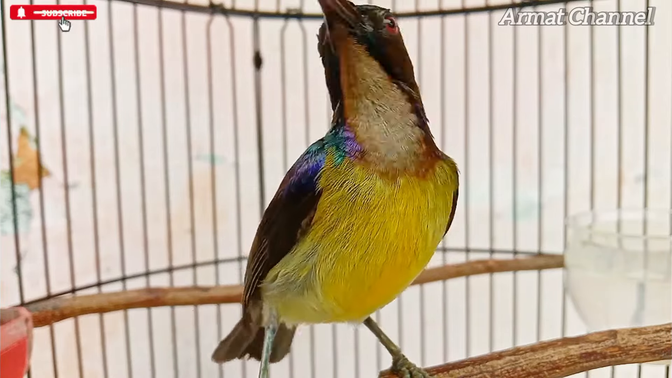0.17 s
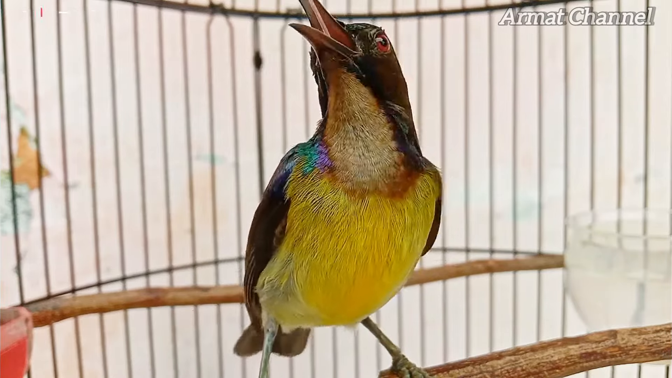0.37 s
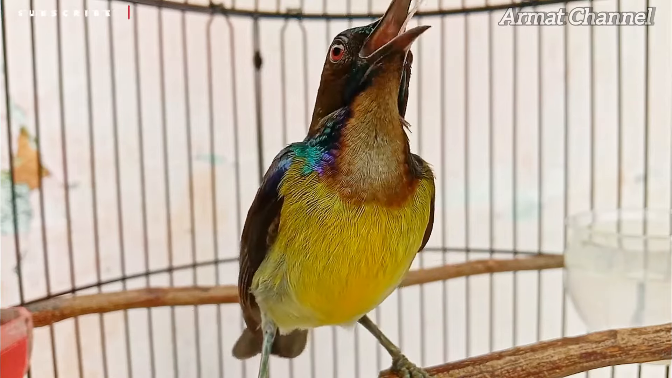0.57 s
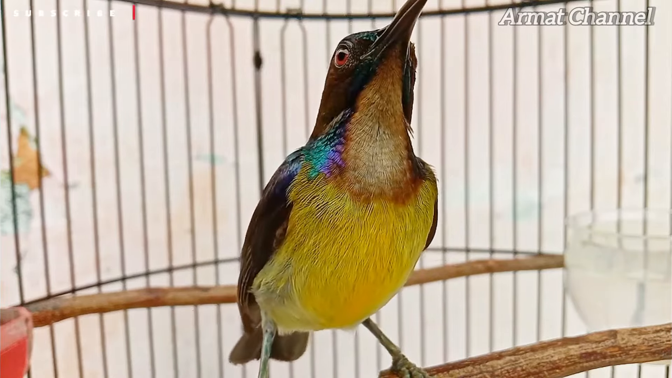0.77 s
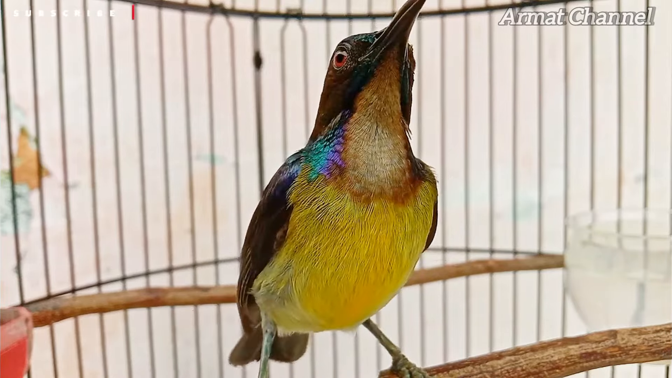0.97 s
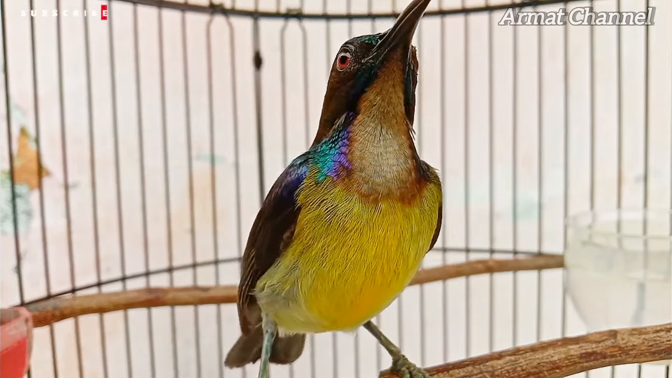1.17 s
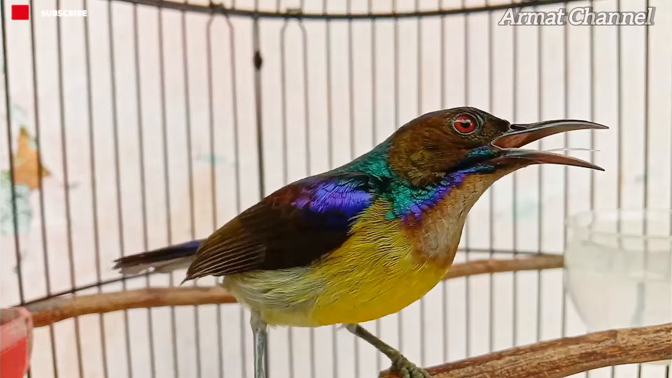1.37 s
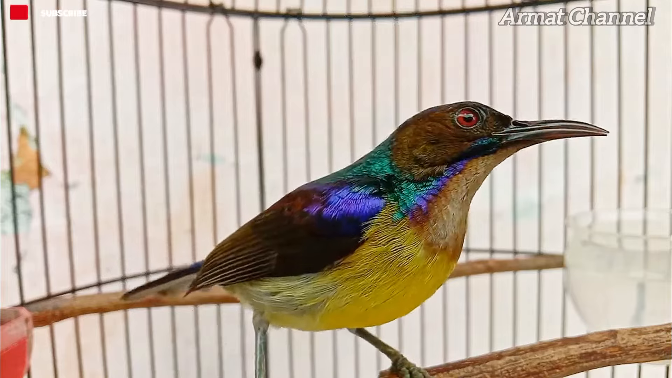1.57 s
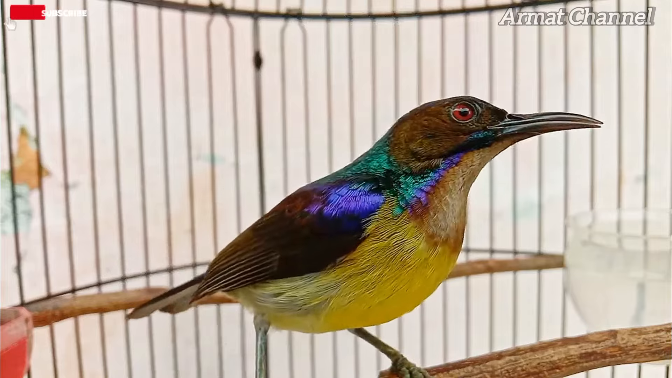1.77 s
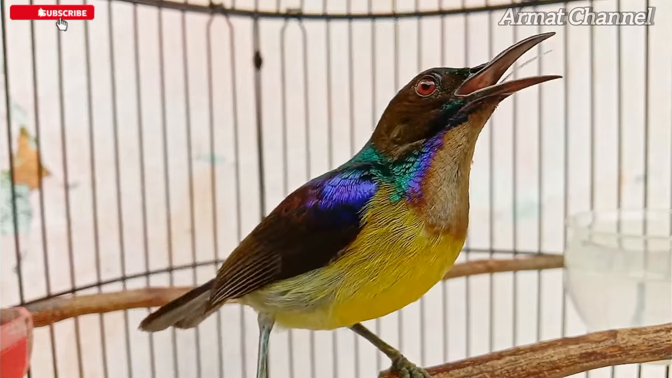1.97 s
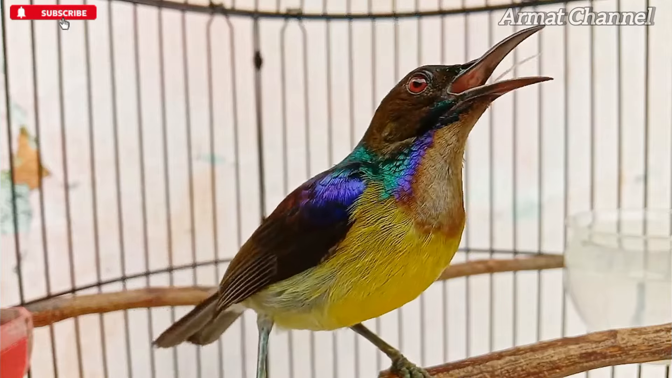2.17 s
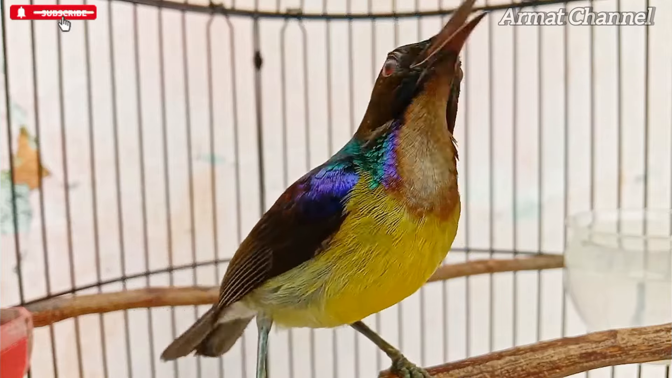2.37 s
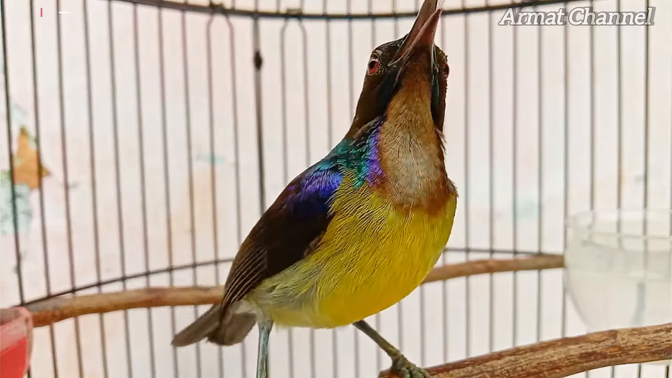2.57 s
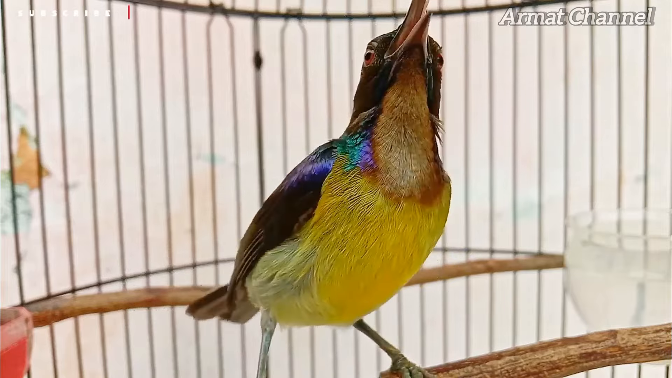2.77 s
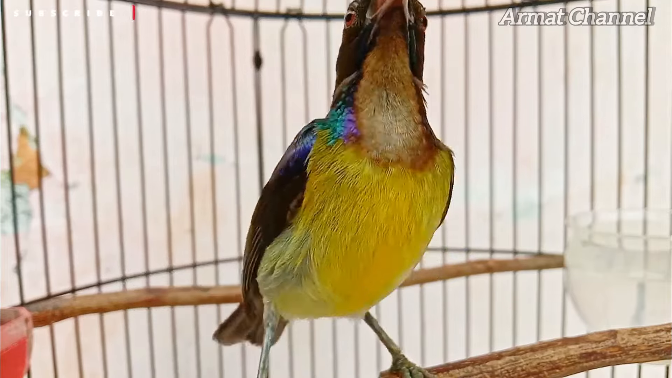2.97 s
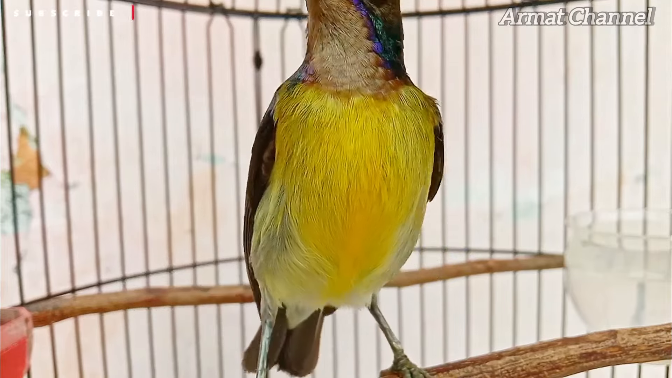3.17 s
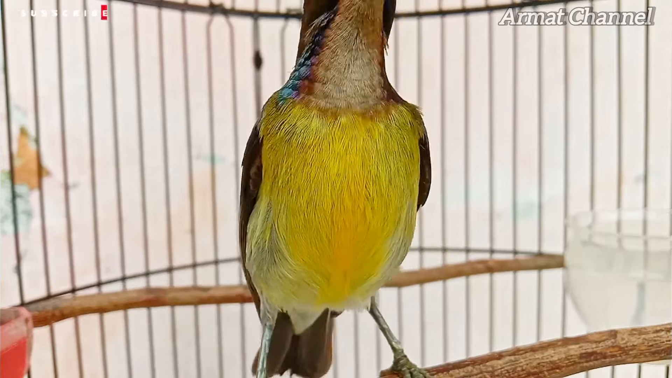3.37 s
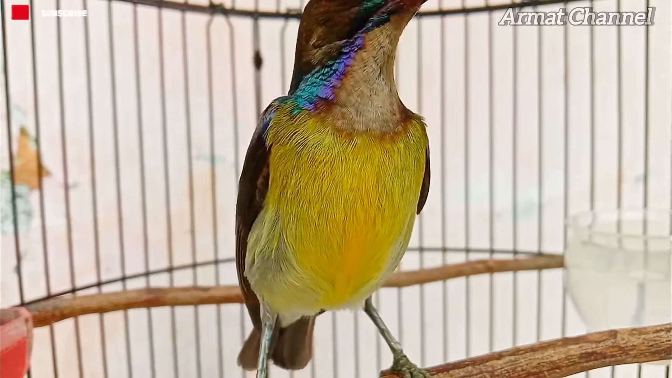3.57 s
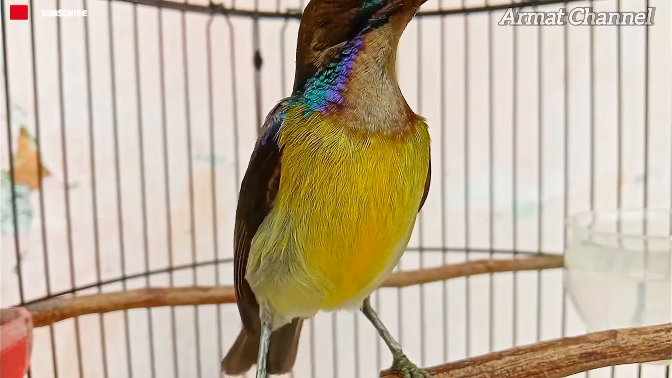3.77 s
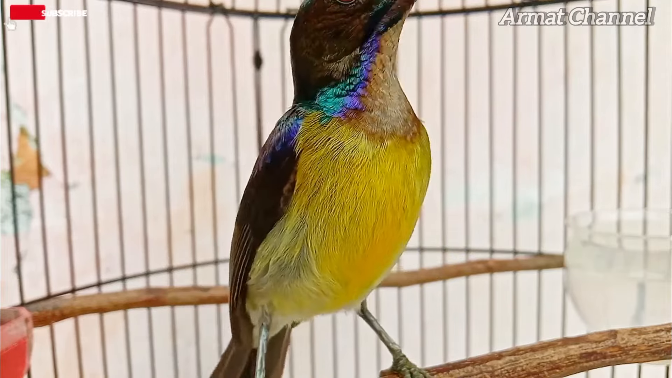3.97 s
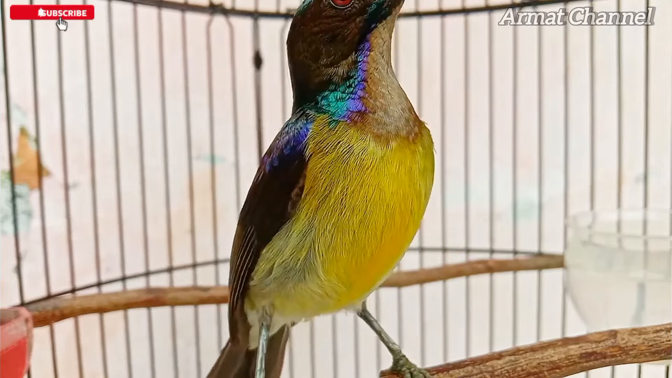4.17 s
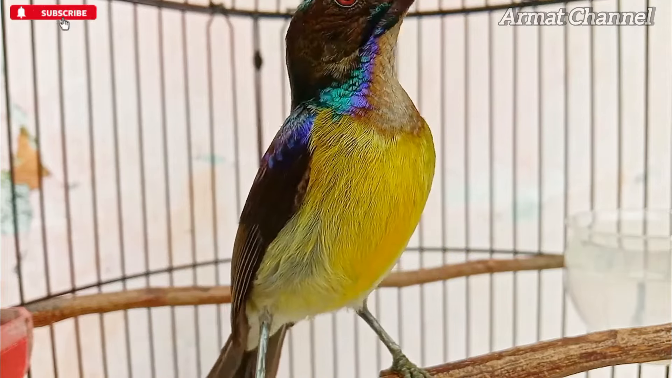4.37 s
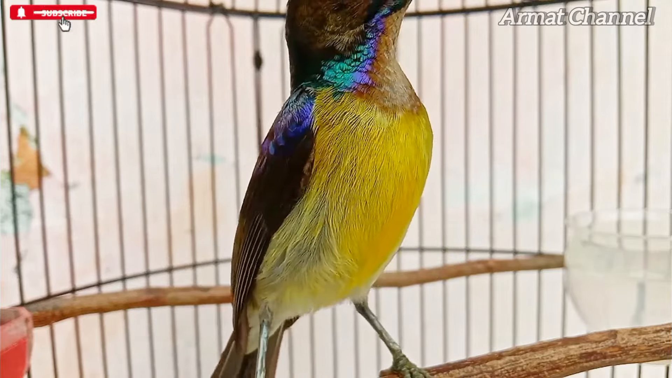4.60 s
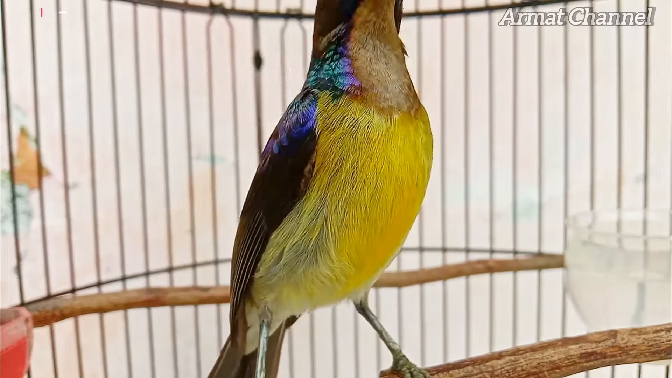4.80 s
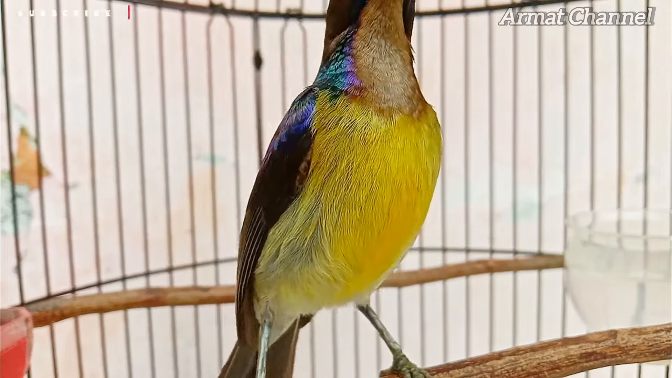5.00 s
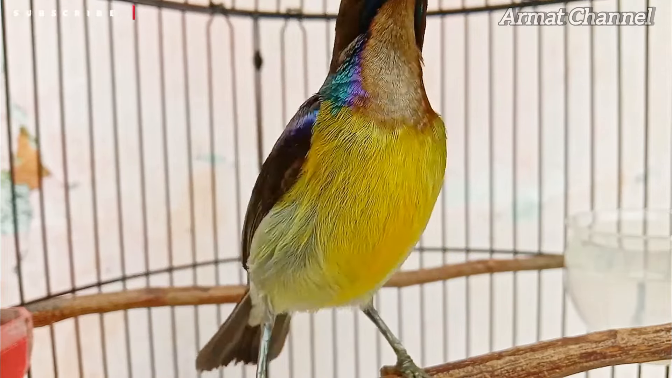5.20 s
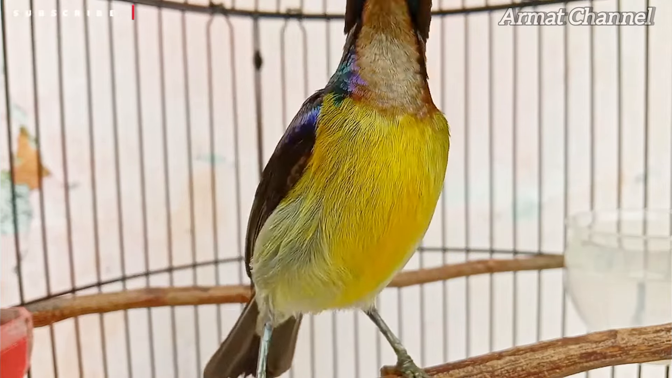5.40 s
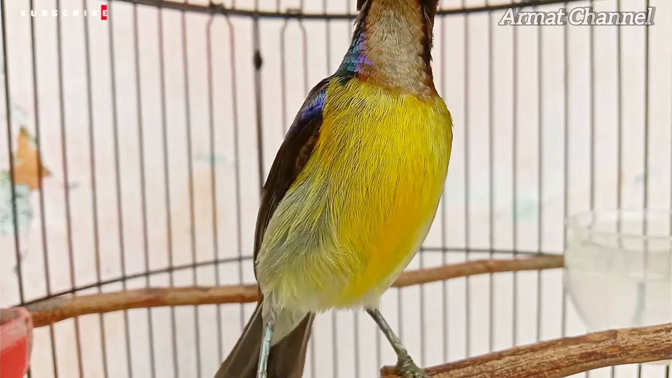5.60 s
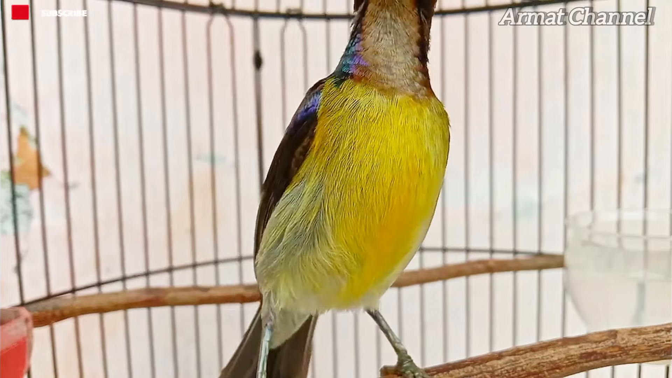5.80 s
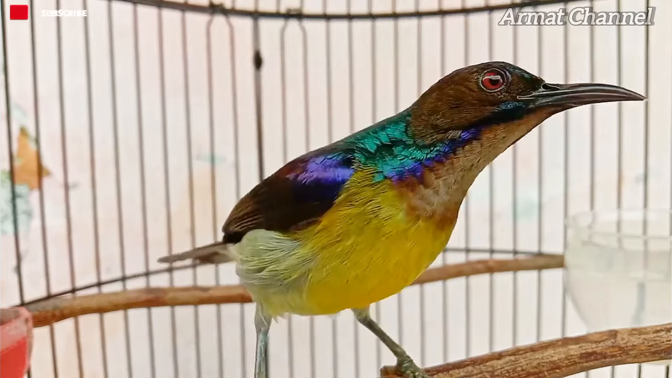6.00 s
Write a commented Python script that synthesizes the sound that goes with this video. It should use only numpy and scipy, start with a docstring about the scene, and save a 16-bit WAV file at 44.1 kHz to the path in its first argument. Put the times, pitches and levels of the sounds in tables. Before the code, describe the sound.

A small bird in a wire cage sings sharp, slightly raspy-edged chirps, dry and close with a short room tail. Spaced calls become an even run, rising to short piercing notes and a slurred whistle, then the song ends. Feathers flutter lightly midway. A low fan hum and thin hiss stay underneath, and a muffled motorbike passes faintly in the distance during the final quiet second.

```python
"""A caged sunbird sings arched chirps close to the microphone, quickening into a high trill:
a harmonic tone swept through a fixed throat. Its bill ticks and its wings flick between chirps,
as bursts of coloured noise; close cage echoes and a small room's diffuse tail answer each note.
A fan hums with wavering tones and noise, other birds call far off in single glides, and a motorbike
passes as pulses through exhaust resonances. A compressor ducks them under the song."""
import sys
import numpy as np
from scipy import signal
from scipy.fft import rfft, irfft
from scipy.io import wavfile
from scipy.ndimage import uniform_filter1d, minimum_filter1d

SR = 44100
rng = np.random.default_rng(int(sys.argv[2]) if len(sys.argv) > 2 else 0)


def unload_audio(sound):
    """Save the sound as a 16-bit wav file, at the path given as the first command line argument."""
    columns = np.transpose(np.atleast_2d(sound))
    # keep every value between -1 and 1, then stretch to whole-number steps
    steps = np.round(np.clip(columns, -1, 1) * 32767)
    wavfile.write(sys.argv[1], SR, steps.astype(np.int16))


N = 266584
TIME = np.arange(N) / SR


def amp(db):
    """Decibels to gain."""
    return 10 ** (np.asarray(db) / 20)


def unit(x):
    """Scales to rms 1."""
    return x / np.sqrt(np.mean(x ** 2) + 1e-20)


def read(points, hz):
    """Reads a (pitch_hz, value) table on a log-frequency axis."""
    table_hz, value = np.transpose(points)
    return np.interp(np.log(hz + 1), np.log(table_hz + 1), value)


def over_time(points, s):
    """Reads a (time_s, value) table along straight lines."""
    return np.interp(s, *np.transpose(points))


def add(mix, start_s, sound):
    """Mixes a sound in at its start time; what falls before zero or past the end is lost."""
    at = round(start_s * SR)
    sound = sound[max(-at, 0):]
    part = mix[max(at, 0):][:len(sound)]
    part += sound[:len(part)]


def noise(spectrum, size=N):
    """Noise of rms 1 with the given colour."""
    hz = np.fft.rfftfreq(size, 1 / SR)
    white = rfft(rng.standard_normal(size))
    return unit(irfft(white * amp(read(spectrum, hz)), size))


def wander(rate_hz):
    """A smooth random curve of rms 1."""
    hz = np.fft.rfftfreq(N, 1 / SR)
    white = rfft(rng.standard_normal(N))
    return unit(irfft(white * np.exp(-(hz / rate_hz) ** 2), N))


def edges(size, attack_s=0.0027, release_s=0.006):
    """A window that opens quickly and closes more softly."""
    t = np.arange(size) / SR
    ramp = np.minimum(np.minimum(t / attack_s, t[::-1] / release_s), 1)
    return np.sin(np.pi / 2 * ramp) ** 2


# Throat and open bill favour whichever harmonic lies near 5.5 kHz: pitch_hz, level_db
THROAT_RESONANCE = [(1000, -34.5), (1800, -34.5), (2500, -32), (3100, -18), (3600, -15), (4300, -10),
                    (5500, 0), (6200, -3.5), (6700, -11.5), (7300, -12.5), (8300, -30), (10000, -33),
                    (12000, -37.5), (14000, -34), (15000, -26.5)]
# Strength of the syrinx harmonics: multiple, level_db
SYRINX_HARMONICS = [(1, 0), (2, -4.5), (3, -14), (4, -21.5), (5, -24), (6, -31.5), (7, -37)]
# The upper harmonics are beamed and change as the head turns: time_s, level_db
HEAD_AIM = [(0, 0.5), (.5, -0.5), (1.2, -2), (1.8, 0), (2.3, -0.5), (3.1, -1.5), (3.9, 0), (4.5, 2), (5, 0)]
# The cage reinforces some frequencies at the microphone and cancels others: pitch_hz, level_db
CAGE_RIPPLE = [(2000, -2), (2500, 2.5), (2900, -6.5), (3500, -4), (4450, 3), (4950, -4), (5350, 0),
               (5750, 1), (6050, 6.5), (6600, -4.5), (7000, -2), (8300, 0), (9500, 0.5), (12000, 14)]


def sunbird(jitter=0.0032, slack_jitter=0.044, slack_hz=2150, rasp_db=-20, air_db=-44,
            pure_hz=3500, purity_db=-17, flicker_db=3.0, shimmer_db=1.9):
    """The syrinx sweeps a harmonic tone through the throat; it rasps at low pitch, turns pure at high."""
    out = np.zeros(N)
    tremble, turbulence = wander(910), noise(THROAT_RESONANCE)
    flicker, shimmer = wander(30), wander(110)
    for start_s, (hz, effort_db) in song():
        here = (round(start_s * SR) + np.arange(len(hz))) % N
        slack = 1 / (1 + (hz / slack_hz) ** 10)  # near 1 at low pitch
        shaken_hz = hz * (1 + (jitter + slack_jitter * slack) * tremble[here])
        phase = 2 * np.pi * np.cumsum(shaken_hz) / SR
        overtones_db = purity_db * np.maximum(np.log2(hz / pure_hz), 0)  # per octave above pure_hz
        bright_db = over_time(HEAD_AIM, start_s)
        tone = np.zeros(len(hz))
        for k, (_, harmonic_db) in enumerate(SYRINX_HARMONICS, 1):
            level_db = harmonic_db + read(THROAT_RESONANCE, k * hz) + read(CAGE_RIPPLE, k * hz)
            level_db += np.sqrt(k - 1) * overtones_db
            if k > 2:
                level_db += bright_db + flicker_db * flicker[here * k % N]  # k times as fast
            tone += amp(level_db) * (k * hz < SR / 2) * np.sin(k * phase)
        rasp = (amp(rasp_db) * slack + amp(air_db)) * turbulence[here]
        effort = amp(effort_db + shimmer_db * shimmer[here])
        add(out, start_s, effort * (tone + rasp) * edges(len(hz)))
    return out


# Chirps close to the microphone: start_s, length_s, rise_s (to the knee), top_s (time to the top),
# drop_s (final drop), up_hz (halfway up), top_hz, down_hz (halfway down), effort_db, tick_db (bill)
CHIRP_NOTES = [ (-.1, 0.16, .015, 0.075, 0.019, 2550, 2780, 2730, -0.5, -45),
               (0.135, 0.17, .012, 0.065, 0.023, 2620, 3026, 2762, 0, -37),
               (0.407, 0.16, 0.028, 0.062, 0.015, 2690, 3087, 2710, 0, -47),
               (1.196, 0.15, .022, .07, 0.019, 2600, 2850, 2510, 0, -23),
               (1.769, 0.17, 0.02, 0.068, 0.024, 2560, 2865, 2662, 0, -34),
               (2.035, 0.18, 0.012, 0.066, 0.02, 2720, 3118, 2750, 0.5, -22),
               (2.282, 0.19, 0.019, 0.077, 0.019, 2850, 3068, 2757, 0, -26),
               (2.542, 0.17, 0.014, 0.071, 0.013, 2630, 3146, 2766, 0.5, -29.5),
               (2.811, 0.17, 0.016, 0.074, 0.018, 2720, 3072, 2712, 0.5, -46),
               (3.078, 0.15, 0.017, 0.071, 0.015, 2630, 3155, 2705, -0.5, -32),
               (3.399, 0.17, 0.011, 0.06, .02, 2710, 3182, 2756, 0, -21.5),
               (3.638, 0.17, 0.0085, 0.061, 0.017, 2750, 3404, 2767, 1, -25.5),
               (3.887, .169, .013, .053, 0.017, 2820, 3700, 2790, 0, -22),
               (4.124, 0.12, 0.015, 0.062, 0.019, 3000, 3980, 3603, 2, -32),
               (4.299, .08, 0.013, .035, 0.0037, 5610, 7130, 6840, -5, -37),
               (4.44, 0.1, 0.017, .045, 0.022, 3670, 4794, 4440, 0, -36),
               (4.775, .08, .014, 0.059, 0.0047, 6250, 6810, 6280, -7.5, -31),
               (4.939, 0.096, 0.024, 0.043, 0.014, 3035, 4640, 4380, 0.5, -35)]
# One slurred whistle in the trill shoots up and settles: time_s, pitch_hz, effort_db
SLURRED_WHISTLE = [(4.593, 1400, -15.5), (4.608, 2830, -3), (4.62, 6750, -1), (4.628, 7460, 5),
                   (4.64, 6210, 1.5), (4.651, 5525, 2), (4.673, 5725, 2.5), (4.687, 6050, -4),
                   (4.698, 5020, -16)]
# The second side of the syrinx overlaps one chirp with a high squeak: time_s, pitch_hz, effort_db
HIGH_SQUEAK = [(1.758, 2930, -2), (1.762, 6600, -20), (1.765, 7670, 11), (1.772, 7420, -3.5),
               (1.779, 7100, 13), (1.787, 6080, -13), (1.795, 6260, -13), (1.807, 4900, -16)]


def song():
    """Every note as its start time and its pitch and effort curves."""
    chirps = [chirp(*row[:-1]) for row in CHIRP_NOTES]
    return chirps + [follow(SLURRED_WHISTLE), follow(HIGH_SQUEAK)]


# Effort that the syrinx puts into each pitch: pitch_hz, effort_db
PITCH_EFFORT = [(1250, -5.5), (1550, -2), (1950, 1.5), (2300, 3), (2700, 4), (3300, -1.5), (4500, 1.5),
                (7000, 16.5)]


def chirp(start_s, length_s, rise_s, top_s, drop_s, up_hz, top_hz, down_hz, effort_db):
    """A note leaps from slack to the knee, arches over the top, sags back and drops away."""
    edge_hz, knee_hz = 1100, 2330
    arch = 1.6  # 1 is a pointed top, 2 is round
    rounding = 0.043  # share of the length over which bends are smoothed
    fade_db = -0.5  # effort lost evenly from start to end
    end_db, end_s = -5.5, 0.042  # further slump as the chirp closes
    t = np.arange(0, length_s, 1 / SR)
    sag_end = length_s - drop_s
    halfway_up, halfway_down = (rise_s + top_s) / 2, (top_s + sag_end) / 2
    times = np.sort([0, rise_s, halfway_up, top_s, halfway_down, sag_end, length_s])
    pitches = np.array([edge_hz, knee_hz, up_hz, top_hz, down_hz, knee_hz, edge_hz])
    # straight lines in this bent scale become arches in pitch
    bent = np.sign(times - top_s) * abs(top_hz - pitches) ** (1 / arch)
    swing = np.interp(t, times, bent)
    hz = uniform_filter1d(top_hz - abs(swing) ** arch, size=max(round(rounding * len(t)), 1))
    closing_db = fade_db * t / length_s + end_db * np.exp((t - length_s) / end_s)
    return start_s, [hz, effort_db + read(PITCH_EFFORT, hz) + closing_db]


def follow(rows):
    """Start time and the rounded-off pitch and effort curves of one drawn call."""
    s, *columns = np.transpose(rows)
    s = np.sort(s)
    t = np.arange(s[0], s[-1], 1 / SR)
    return s[0], [uniform_filter1d(np.interp(t, s, column), size=90) for column in columns]


def onset_noise(level_db=-25, rise_s=0.003, fall_s=0.006, lag_s=0.004):
    """A short, soft burst of noise in the throat's colour around the start of each chirp."""
    swell = np.zeros(N)
    t = (np.arange(2048) - 1024) / SR
    shape = np.exp(np.minimum(t / rise_s, -t / fall_s))
    for start_s, *_ in CHIRP_NOTES:
        add(swell, start_s + lag_s + t[0], shape)
    return amp(level_db) * swell * noise(THROAT_RESONANCE)


# Colour of the bill snap: pitch_hz, level_db
BILL_COLOUR = [(100, -13.5), (500, -10.5), (1300, 1), (2500, -7.5), (5500, 12), (7500, -15), (10000, -33),
               (15000, -38.5)]


def ticks(level_db=0, lead_s=0.0052):
    """The bill snaps open just before each chirp: a tiny burst of coloured noise."""
    out, t = np.zeros(N), np.arange(1024) / SR
    shape = (1 - np.exp(-t / .0003)) * np.exp(-t / .0012)
    for start_s, *_, tick_db in CHIRP_NOTES:
        snap = noise(BILL_COLOUR, size=1024) * shape
        add(out, start_s - lead_s, amp(tick_db + level_db) * snap)
    return out


# Wing flicks and body thumps near the microphone: start_s, rustle_db (feathers), push_db (air), fade_s (of the
# rustle)
FLICKS_AND_THUMPS = [(0.334, -43.5, -42, 0.02), (.757, -57.5, -56, 0.019), (.8, -60.5, -61.5, .02),
                     (1.662, -47.5, -47, 0.021), (1.689, -44, -44.5, 0.0093), (1.72, -41.5, -37, 0.013),
                     (2.051, -57, -46, 0.059), (2.248, -50, -40.5, 0.011), (2.764, -50.5, -45, 0.15),
                     (3.058, -57, -44, 0.056), (3.102, -41, -39, 0.086), (3.26, -46.5, -37, 0.024),
                     (3.297, -33, -35, 0.0029), (3.321, -39.5, -47, 0.011), (3.353, -45.5, -49.5, 0.042),
                     (3.529, -48, -37.5, 0.029), (3.846, -47, -45, 0.013), (4.271, -71, -49.5, 0.046),
                     (5.243, -53.5, -44.5, 0.027), (5.274, -47.5, -54, 0.013), (5.304, -50, -46.5, 0.014),
                     (5.945, -78.5, -44.5, 0.025)]
# Colour of the feather rustle: pitch_hz, level_db
FEATHER_COLOUR = [(200, 4.5), (600, -5), (1300, 3.5), (2500, -3), (5500, 4), (7500, -5), (10000, -18.5),
                  (15000, -11.5)]
# Colour of the pushed air: pitch_hz, level_db
AIR_COLOUR = [(20, -32.5), (40, -18), (62, 4.5), (110, 9), (250, -8.5), (500, -13), (1500, -39.5),
              (5000, -92)]


def wings(rustle_gain_db=1, push_gain_db=2, grain_db=6.0, rise_s=0.0025, settle_db=-15, settle_s=0.019):
    """Each flick or thump is a grainy feather rustle on a soft push of air; the feathers then settle."""
    rustle, push = np.zeros(N), np.zeros(N)
    t = np.arange(8192) / SR
    rise = 1 - np.exp(-t / rise_s)
    settling = amp(settle_db) * np.exp(-t / settle_s)
    for start_s, rustle_db, push_db, fade_s in FLICKS_AND_THUMPS:
        add(rustle, start_s, amp(rustle_db) * rise * (np.exp(-t / fade_s) + settling))
        add(push, start_s, amp(push_db) * rise * np.exp(-t / (2 * fade_s)))
    grain = amp(rustle_gain_db + grain_db * wander(242))
    return grain * rustle * noise(FEATHER_COLOUR) + amp(push_gain_db) * push * noise(AIR_COLOUR)


# Echoes from the cup, the cage floor and the wall: delay_s, level_db
CLOSE_ECHOES = [(.0011, -24.5), (.0029, -23), (.0047, -16), (.0068, -17)]


def cage(x):
    """A few close echoes beat against each glide and make its level ripple."""
    out = x.copy()
    for delay_s, level_db in CLOSE_ECHOES:
        add(out, delay_s, amp(level_db) * x)
    return out


# Time the small room takes to die by 60 dB: pitch_hz, decay_s
ROOM_DECAY = [(200, 0.63), (2000, 0.23), (4000, 0.24), (5500, 0.29), (7000, 0.33), (10000, 0.17),
              (15000, 0.18)]
# Colour of the room: pitch_hz, level_db
ROOM_TINT = [(300, -6.5), (1300, 2.5), (2500, 2.5), (3700, 5), (5000, 5.5), (6500, -3), (8500, -4),
             (12000, 2), (15000, -1.5)]


def room(x, build_s=0.0036):
    """A diffuse tail of noise, each band dying at its own speed."""
    hz, t, bands = signal.stft(rng.standard_normal(SR), SR, nperseg=256)
    decay_db = -60 * t / read(ROOM_DECAY, hz)[:, None]
    build = 1 - np.exp(-t / build_s)
    bands = bands * amp(read(ROOM_TINT, hz)[:, None] + decay_db) * build
    tail = signal.istft(bands, SR, nperseg=256)[1]
    return signal.fftconvolve(x, tail / np.linalg.norm(tail))[:N]


# Faint far whistles and hoots: start_s, length_s, first_hz, last_hz, level_db
FAR_WHISTLES = [(.63, 0.057, 838, 786, -57.5), (0.784, 0.35, 655, 636, -61.5),
                (.88, 0.209, 1277, 1237, -54.5), (0.934, 0.3, 4960, 4920, -57.5),
                (1.001, 0.19, 4130, 4500, -60.5), (1.558, 0.073, 4920, 3000, -54.5),
                (1.669, 0.0083, 6000, 3400, -39), (2.401, 0.084, 437, 398, -46),
                (2.399, 0.067, 890, 657, -46.5), (5.184, 0.048, 5190, 4520, -41.5),
                (5.864, 0.032, 5054, 2530, -47.5), (5.901, 0.031, 4970, 4160, -51)]


def far_birds(waver=0.012):
    """Faint wavering whistles and hoots, each one glide that swells and fades."""
    out, drift = np.zeros(N), wander(150)
    for start_s, length_s, first_hz, last_hz, level_db in FAR_WHISTLES:
        progress = np.arange(0, length_s, 1 / SR) / length_s
        glide_hz = first_hz + (last_hz - first_hz) * progress
        hz = glide_hz * (1 + waver * drift[:len(progress)])
        whistle = np.sin(2 * np.pi * np.cumsum(hz) / SR)
        add(out, start_s, amp(level_db) * np.sin(np.pi * progress) * whistle)
    return out


# The passing motorbike: time_s, firing_hz, level_db, bright_db (for the upper resonances)
BIKE_PASS = [(4.202, 84, -94, -33), (4.424, 88.8, -54.5, -60), (4.6, 93.7, -64, -1),
             (4.73, 95.8, -56.5, -28), (4.95, 84, -58.5, -3), (5.098, 93, -57, -5), (5.3, 90.64, -60, 2.5),
             (5.5, 96.03, -58, -0.5), (6.05, 85.4, -62.5, 3)]
# Exhaust resonances: pitch_hz, half_width_hz (of each filter pass), level_db
EXHAUST_MODES = [(349.5, 12, -0.5), (740, 95, 6.5), (1237, 44, 3), (1350, 154, 9), (1640, 53, 7.5),
                 (2890, 280, -4.5)]


def motorbike(rough=0.77, unsteady=0.012):
    """Firing pulses and exhaust noise in a few resonances that brighten as it comes into the open."""
    s, *columns = np.transpose(BIKE_PASS)
    firing_hz, level_db, bright_db = (np.interp(TIME, s, column) for column in columns)
    phase = 2 * np.pi * np.cumsum(firing_hz * (1 + unsteady * wander(12.16))) / SR
    firing = np.diff(phase // (2 * np.pi), prepend=0)  # one pulse per cycle
    drive = unit(firing - firing.mean()) + rough * rng.standard_normal(N)
    out, power = np.zeros(N), np.zeros(N)
    for k, (hz, half_width_hz, mode_db) in enumerate(EXHAUST_MODES):
        b, a = signal.iirpeak(hz, hz / (2 * half_width_hz), fs=SR)
        ringing = signal.lfilter(b, a, signal.lfilter(b, a, drive))
        gain = amp(mode_db + bright_db * min(k, 2) / 2)  # none, half, then all of the brightness
        out += gain * unit(ringing)
        power += gain ** 2
    return amp(level_db) * out / np.sqrt(power)


# Motor lines of the fan: pitch_hz, level_db
FAN_HUM = [(102.3, -52), (123, -62.5), (143.5, -58.5), (205, -74), (225, -70.5), (245.5, -69.5), (266, -68),
           (287, -78), (308, -68.5)]
# Colour of the air rumble: pitch_hz, level_db
RUMBLE_COLOUR = [(25, -23.5), (55, -12.5), (95, 3.5), (150, -9.5), (200, -21), (290, -13.5), (550, -27.5),
                 (950, -34.5), (1280, -15), (1600, -59.5), (3500, -32), (7000, -52.5)]
# Colour of the thin hiss: pitch_hz, level_db
HISS_COLOUR = [(1000, -13), (2500, 1), (4500, -14), (6500, -4), (8500, -23.5), (15000, -17)]
# Hum and rumble fade as the fan swings away: time_s, level_db
FAN_TURN = [(0, -2), (.7, -4), (1.6, 2), (2.2, -8), (3.5, -1.5), (4.6, -4), (5.4, -9), (6.04, -7.5)]


def fan(hum_db=0, waver=0.62, rumble_db=-48, swell_db=2, hiss_db=-69):
    """Wavering motor lines over a rumble of air and a thin hiss."""
    hum = np.zeros(N)
    for hz, level_db in FAN_HUM:
        line = np.sqrt(2) * np.sin(2 * np.pi * hz * TIME + wander(3.1))
        hum += amp(level_db) * (1 + waver * wander(3.9)) * line
    rumble = amp(rumble_db + swell_db * wander(6)) * noise(RUMBLE_COLOUR)
    swing = amp(over_time(FAN_TURN, TIME))
    return swing * (amp(hum_db) * hum + rumble) + amp(hiss_db) * noise(HISS_COLOUR)


def scene(wet_db=-21, far_dry_db=-2, far_wet_db=-4, bike_db=1):
    """The near bird is mostly dry, far birds carry more room and the motorbike is all room."""
    near = cage(sunbird() + onset_noise() + ticks() + wings())
    far = far_birds()
    tail = room(amp(wet_db) * near + amp(far_wet_db) * far + amp(bike_db) * motorbike())
    return (near + amp(far_dry_db) * far + tail + fan())[None]


def record(dry):
    """The microphone sheds deep bass; a look-ahead compressor evens out the chirps; then the band limit."""
    dry = signal.sosfilt(signal.butter(4, 48, "highpass", fs=SR, output="sos"), dry)
    threshold_db, ratio, ceiling_db, recovery_db_per_s = -18, 2, -7.4, 130
    peak_db = 20 * np.log10(1e-9 - minimum_filter1d(-abs(dry[0]), size=180))
    squeeze_db = (peak_db - threshold_db) * (1 - 1 / ratio)
    over_db = np.maximum(squeeze_db, peak_db - ceiling_db).clip(0)
    fall_db = TIME * recovery_db_per_s
    held_db = np.maximum.accumulate(over_db + fall_db) - fall_db  # ducks at once, recovers steadily
    duck_db = uniform_filter1d(held_db, size=180)
    lowpass = signal.firwin(511, 15800, window=("kaiser", 9), fs=SR)  # cutoff in Hz
    return signal.oaconvolve(dry * amp(-duck_db), lowpass[None], "same")


dry = scene()
out = record(dry)
unload_audio(out)
```